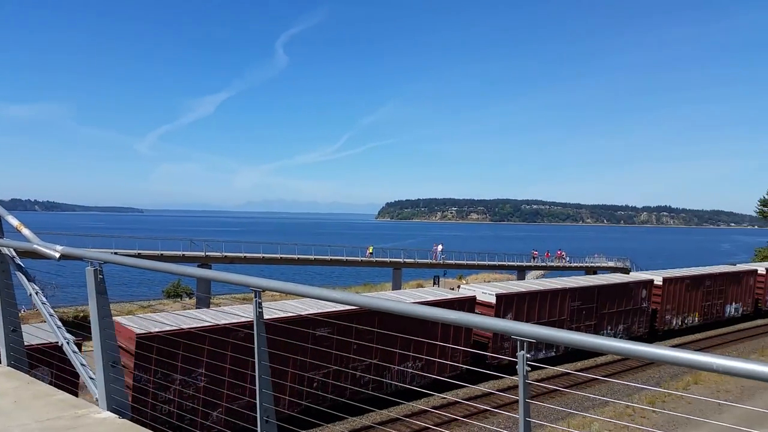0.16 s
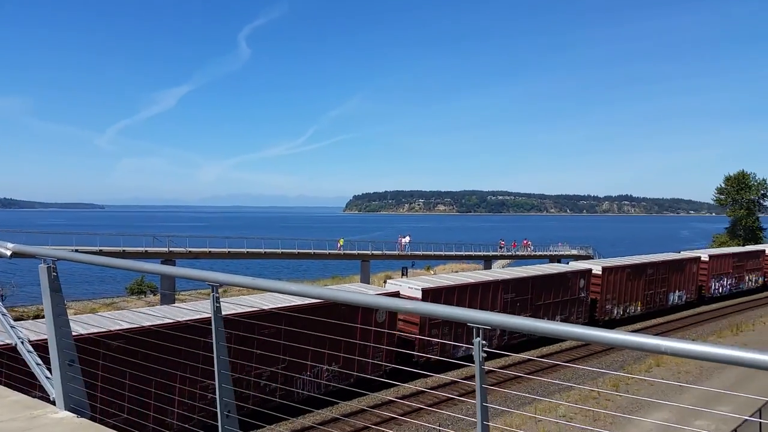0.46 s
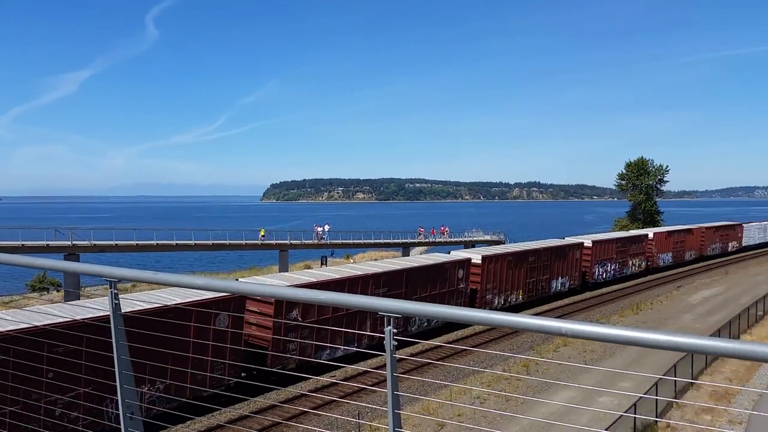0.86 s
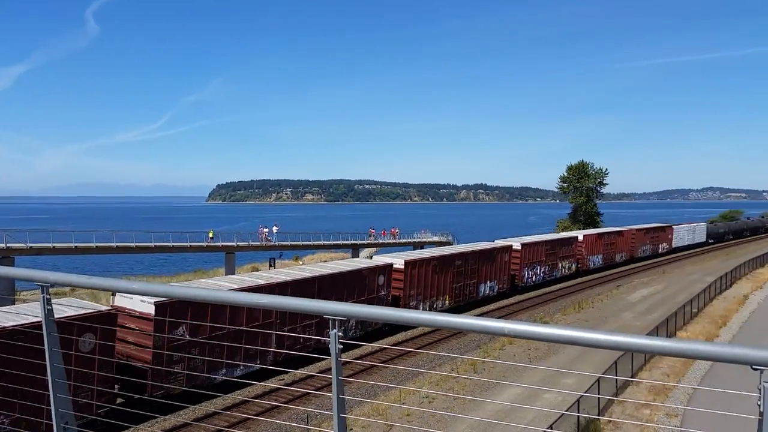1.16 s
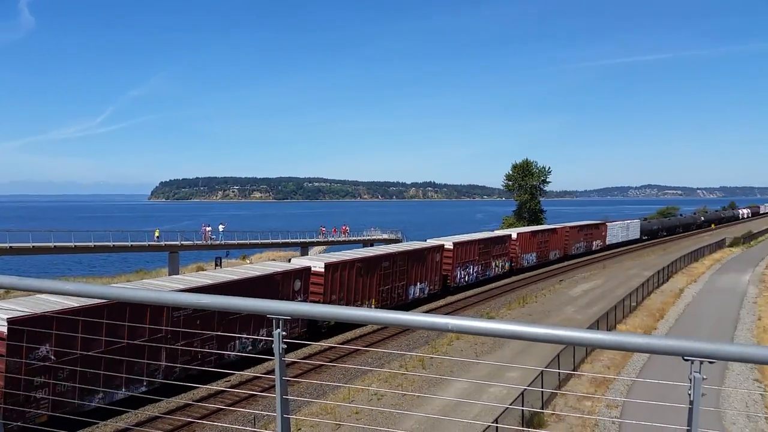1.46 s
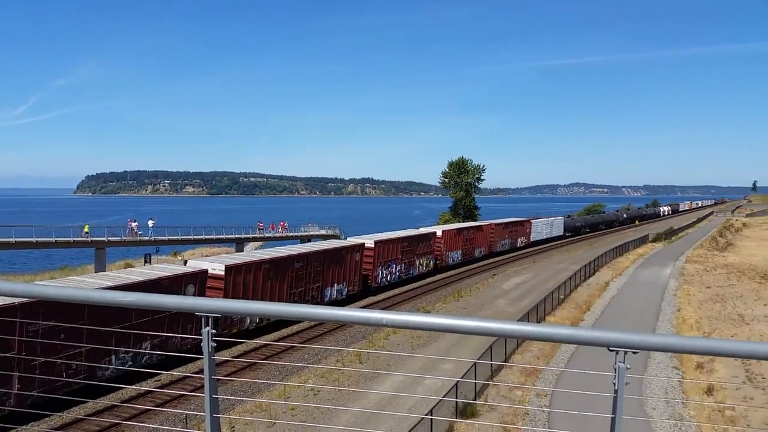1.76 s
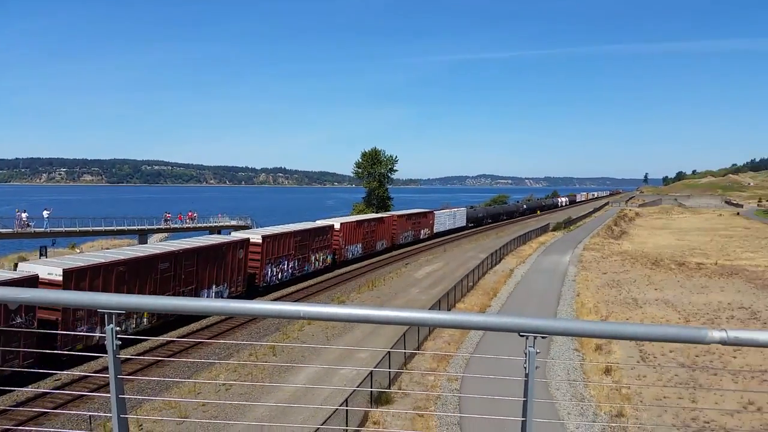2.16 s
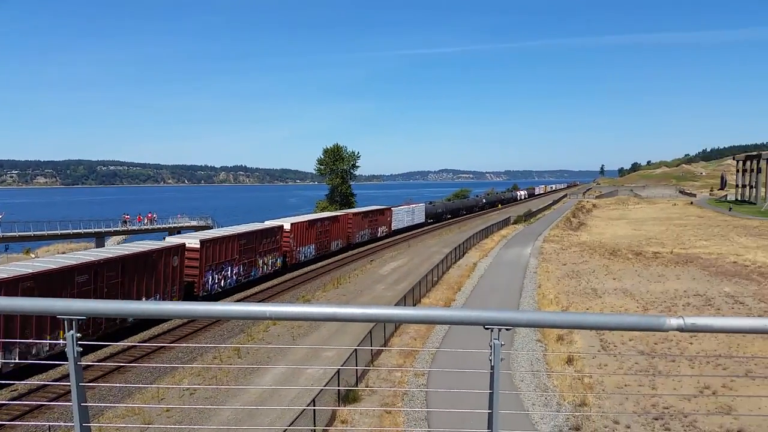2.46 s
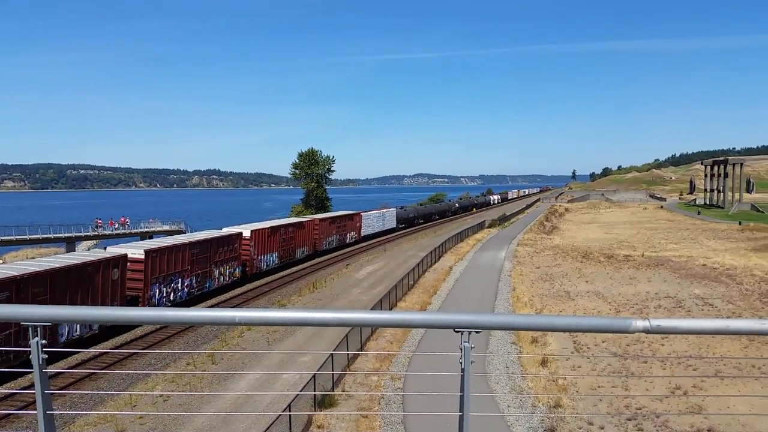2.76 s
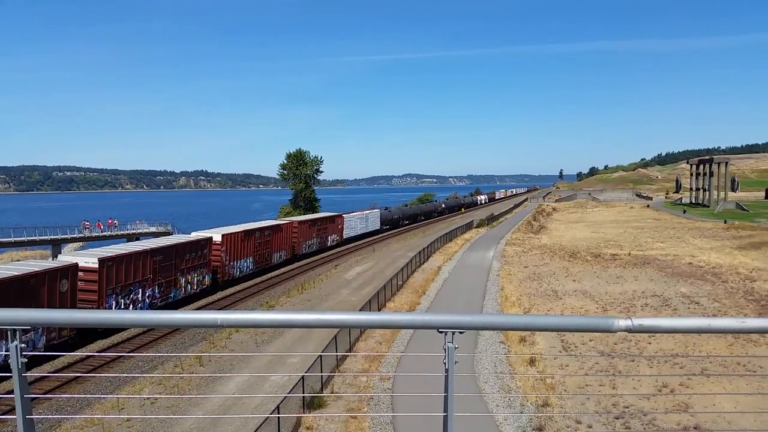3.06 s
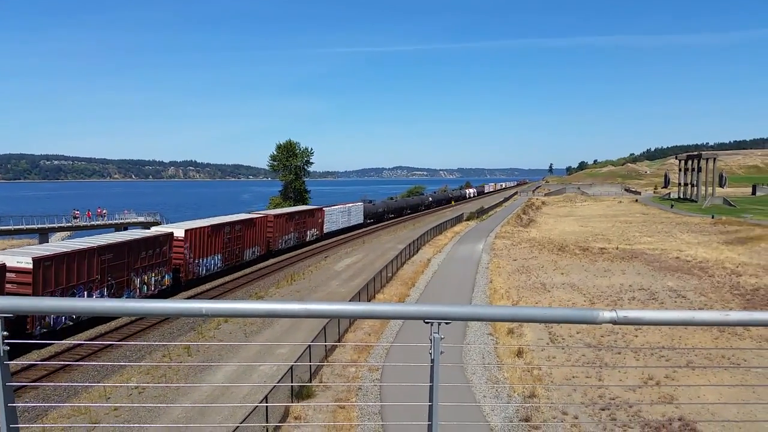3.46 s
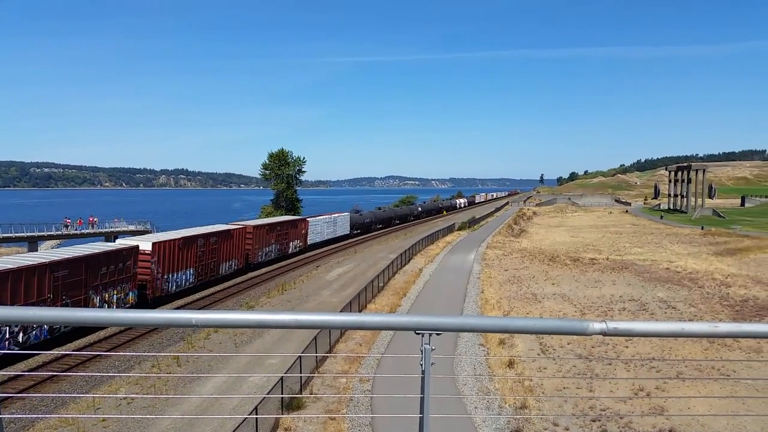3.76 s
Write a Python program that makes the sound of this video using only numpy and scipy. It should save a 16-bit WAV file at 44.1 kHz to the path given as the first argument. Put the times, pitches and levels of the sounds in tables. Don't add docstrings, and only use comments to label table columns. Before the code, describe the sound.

Freight train passing outdoors near water, heard from above on a windy handheld stereo microphone, wind much heavier on the right. Low buffeting and faint scrapes come first, then sharp metallic hissing, easing and returning over stronger rolling.

```python
import sys
import numpy as np
from scipy import signal
from scipy.fft import rfft, irfft
from scipy.io import wavfile
from scipy.ndimage import uniform_filter1d

SR = 44100
rng = np.random.default_rng(int(sys.argv[2]) if len(sys.argv) > 2 else 0)


def voltage_ratio(decibels):
    exponent = np.asarray(decibels, float) / 20
    return 10 ** exponent


def output_pcm(signal):
    pcm = np.clip(np.atleast_2d(signal).T, -1, 1) * 32767
    wavfile.write(sys.argv[1], SR, np.round(pcm).astype(np.int16))


N = 172431


def in_time(rows):
    s, *columns = np.transpose(rows)
    return [np.interp(np.arange(N) / SR, s, column) for column in columns]


def at_hz(points, hz):
    point_hz, point_db = np.transpose(points)
    return np.interp(np.log(hz), np.log(point_hz), point_db)


def rms_one(x):
    return x / np.sqrt(np.mean(x ** 2) + 1e-20)


def drift(rate):
    r = np.exp(-80 * np.pi * rate / SR)
    slow = signal.lfilter([1], [1, -2 * r, r * r], rng.standard_normal(N // 40 + 2002))[2000:]
    return np.interp(np.arange(N) / 40, np.arange(len(slow)), rms_one(slow))


def colour(x, spectrum):
    hz = np.maximum(np.fft.rfftfreq(N, 1 / SR), 1)
    first_hz, first_db = spectrum[0]
    last_hz, last_db = spectrum[-1]
    closed = [(first_hz / 2, first_db - 30)] + list(spectrum) + [(last_hz * 2, last_db - 30)]
    return rms_one(irfft(rfft(x) * voltage_ratio(at_hz(closed, hz)), N))


def patchy(low_hz, high_hz, shared_db, own_db, rate, swing_db=0):
    # pitch_hz, share (dB per dB)
    tilt = [(30, -2.5), (150, 0.1), (400, 0.4), (1000, 0.92)]
    out, together, white = 0, drift(rate), rng.standard_normal((2, N))
    edges = np.minimum(20 * 2 ** np.arange(0, 10.1, .5), 19500)
    for k, (low, high) in enumerate(zip(edges, edges[1:])):
        if high > low_hz and low < high_hz:
            band_filter = signal.butter(2, [low, high], "band", fs=SR, output="sos")
            band = signal.sosfilt(band_filter, white[k % 2])
            flicker_db = shared_db * together + own_db * drift(2 * rate)
            out = out + band * voltage_ratio(flicker_db + swing_db * at_hz(tilt, low))
    return out


def streaky(x):
    streak_db, streak_s = 2.5, .25
    z = signal.stft(x, nperseg=512)[2]
    field = uniform_filter1d(rng.standard_normal(z.shape), size=int(streak_s * SR / 256), axis=1)
    return signal.istft(z * voltage_ratio(streak_db * rms_one(field)), nperseg=512)[1][:N]


def narrow(hz, width_hz, steady):
    phase = 2 * np.pi * np.cumsum(hz) / SR
    return rms_one((steady + drift(width_hz)) * np.cos(phase) + drift(width_hz) * np.sin(phase))


def swell(start, length, attack, release):
    t = np.arange(N) / SR - start
    rise = np.clip(t / attack + (start <= 0), 0, 1)
    return rise * np.exp(-np.maximum(t - length, 0) / release)


def flanges():
    # start_s, level_db
    pressure = [(0, -30.5), (.2, -37.5), (.38, -43), (.78, -43.5), (1.0, -37.5), (1.52, -31), (1.7, -37),
                (1.85, -34.5), (1.99, -39), (2.06, -19), (2.2, -23), (2.3, -24), (2.6, -22.5), (2.85, -32),
                (3.08, -31.5), (3.14, -24.5), (3.37, -23), (3.47, -27.5)]
    # start_s, level_db
    last_swell = [
        (3.47, -4.5),
        (3.72, -0.5),
        (3.91, -2.5),
    ]
    # pitch_hz, level_db
    hiss_right = [(4500, -17.5), (5510, -18.5), (7000, -17), (8500, -13), (9430, -2.5), (11100, 0),
                  (13500, -7), (15700, -11.5)]
    hiss_left = [(3500, 10), (5000, 14), (5700, 19), (6300, 24), (7200, 14), (8800, -25), (11500, -40),
                 (15700, -20)]
    # start_s, length_s, level_db, brightness_db
    scrapes = [
        (0.81, 0.03, -57, 12),
        (0.891, 0.098, -42.5, 4.5),
        (1.101, 0.095, -38.5, 3.5),
        (1.343, 0.083, -36, 3),
        (2.001, 0.07, -38.5, 11),
        (3.688, 0.021, -41, 3),
    ]
    # pitch_hz, level_db
    scrape_spectrum = [(1800, -9), (2400, 1), (2900, 1.5), (3800, 1), (4800, -6.5), (5600, -13),
                       (7500, -16), (9000, -12)]

    low, top = 0, 0
    for start, length, db, bright_db in scrapes:
        shape = swell(start, length, attack=0.027, release=0.041)
        low = low + voltage_ratio(db) * shape
        top = top + voltage_ratio(db + bright_db) * shape
    rasp = colour(streaky(rng.standard_normal(N)), scrape_spectrum)
    press = np.hypot(voltage_ratio(in_time(pressure)[0] + in_time(last_swell)[0]), top)

    noise = streaky(patchy(3000, 20000, shared_db=1.2, own_db=1, rate=9))
    hiss = colour(noise, hiss_right) + whistles()
    air = signal.sosfiltfilt(signal.butter(2, 12800, "high", fs=SR, output="sos"), hiss)
    hiss = hiss + air * (np.minimum(press / voltage_ratio(-40), 1) - 1)
    right = press * hiss + low * rasp

    left = colour(streaky(patchy(2000, 20000, shared_db=1.2, own_db=1, rate=9)), hiss_left)
    return np.array([voltage_ratio(-55) * press / voltage_ratio(-25) * left, right])


def whistles():
    # start_s, length_s, pitch_hz, slide (Hz per s)
    modes = [(0, .33, 9421, 0), (0, .3, 11150, 0), (.92, .5, 10300, 0), (2.05, .11, 9755, 0),
             (2.04, .15, 10271, 0), (2.04, .05, 10750, -7000), (2.04, .14, 11400, 0),
             (2.06, .25, 12100, 300), (2.1, .7, 12780, 300), (2.12, .06, 14303, 0), (2.05, .06, 15111, 0),
             (2.48, .42, 11360, -80), (2.15, .6, 6230, 0), (3.1, .3, 6240, 0), (3.1, .37, 11400, -300),
             (3.5, .41, 11270, -100), (3.27, .13, 12866, 0), (3.42, .49, 12880, -250),
             (3.12, .05, 10500, 0), (3.6, .2, 4700, 0), (2.3, .15, 4650, 0), (2.08, .15, 13178, 0),
             (2.1, .15, 12500, 0), (.92, .6, 7500, 0), (0, .2, 6100, 0), (1.12, .07, 2400, 5000),
             (1.1, .08, 3250, 0), (1.36, .05, 4600, 0), (1.35, .07, 3600, 0), (1.37, .06, 2800, 0),
             (1.37, .06, 6400, 0)]
    mode_db = [-6, -14, -13, -8, -7, -6, -11, -13, -14, -17, -19, -8, -23, -23, -7.5, -7.5, -9, -11, -12,
               -19, -19.5, -15, -16, -20, -21.5, -13, -17, -14, -14, -15, -20]
    edge_s, wander_hz, flutter_db = .055, 25, 2
    out, t = np.zeros(N), np.arange(N) / SR
    for (start, length, hz, slide), db in zip(modes, mode_db):
        pitch_hz = hz + slide * np.clip(t - start, 0, length) + wander_hz * drift(6)
        tone = narrow(pitch_hz, width_hz=45, steady=.6)
        out += voltage_ratio(db + flutter_db * drift(14.0)) * swell(start, length, edge_s, edge_s) * tone
    return out


def rolling():
    # start_s, level_db
    roar = [(0, -44.5), (.25, -50.5), (.8, -50.5), (1.0, -49.5), (1.9, -44.5), (2.02, -44), (2.6, -42),
            (3.1, -40), (3.35, -41), (3.45, -45), (3.7, -40.5), (3.91, -40)]
    # pitch_hz, level_db
    roar_right = [(400, -20), (900, 1), (1500, 1), (2200, 0), (3300, -4), (3800, -5.5), (4700, -13.5),
                  (5500, -15.5)]
    roar_left = [(400, -9), (1300, -7.5), (2200, -21), (3000, -8.5), (3750, 0.5), (4200, -4.5), (4750, -4),
                 (5700, -28)]
    alike_below_hz, right_db = 1300, 5.5
    right, other = (streaky(patchy(200, 14000, shared_db=1.28, own_db=0.4, rate=9.2)) for port in range(2))
    low = signal.butter(2, alike_below_hz, "low", fs=SR, output="sos")
    high = signal.butter(2, alike_below_hz, "high", fs=SR, output="sos")
    left = signal.sosfiltfilt(low, right) + signal.sosfiltfilt(high, other)
    ports = np.array([colour(left, roar_left), voltage_ratio(right_db) * colour(right, roar_right)])
    return voltage_ratio(in_time(roar)[0]) * ports


def wind():
    # start_s, level_db, brightness_db
    gusts = [(0, -14, -0.5), (.3, -14.5, 2), (.6, -15.5, 2), (.9, -15, 1), (1.05, -19, -1.5),
             (1.3, -21, -1), (1.6, -21.5, -2), (1.9, -20.5, -3.5), (2.2, -19, -3), (2.5, -17.5, -2),
             (2.75, -16.5, 1), (3.0, -16, -2), (3.25, -19, 2), (3.42, -16.5, -5), (3.65, -17.5, -2.5),
             (3.91, -22.5, 1.5)]
    # pitch_hz, level_db
    open_spectrum = [(20, -31), (43, -6.5), (78, 2), (160, -0.5), (260, -3), (409, -9.5), (818, -21),
                     (2760, -47)]
    # start_s, level_db
    shaded = [(0, -31), (.3, -29.5), (.9, -35.5), (1.2, -34), (1.5, -40), (1.9, -38), (2.2, -36),
              (2.7, -32), (3.1, -38), (3.45, -40.5), (3.91, -39)]
    # pitch_hz, level_db
    shaded_spectrum = [(20, -9), (45, 2.5), (90, 0.5), (160, -3), (300, -12), (500, -21.5), (900, -56),
                       (2000, -61)]
    strength_db, bright_db = in_time(gusts)
    noise = patchy(0, 5000, shared_db=1.5, own_db=0.74, rate=32.4, swing_db=bright_db)
    right = voltage_ratio(strength_db + 5.5) * evened(colour(noise, open_spectrum))
    right += edge_hum() + slaps()
    noise = patchy(0, 3000, shared_db=2.5, own_db=1.5, rate=18)
    left = voltage_ratio(in_time(shaded)[0]) * colour(noise, shaded_spectrum)
    leak = signal.sosfilt(signal.butter(1, (250, 1200), "band", fs=SR, output="sos"), right)
    return np.array([left + voltage_ratio(-42.5) * leak, right])


def evened(x):
    even_share, even_s = .35, .04
    short_power = uniform_filter1d(x ** 2, size=int(even_s * SR))
    long_power = uniform_filter1d(x ** 2, size=int(10 * even_s * SR))
    return rms_one(x * (short_power / long_power + 1e-3) ** (-even_share / 2))


def edge_hum():
    # start_s, pitch_hz, level_db
    hum = [(0, 180, -23), (.2, 105, -18), (.3, 170, -14.5), (.43, 250, -15), (.55, 155, -24),
           (.74, 90, -21), (.95, 210, -20.5), (1.1, 130, -24), (1.3, 120, -31), (2.0, 90, -26),
           (2.5, 120, -26), (2.62, 300, -25), (2.95, 150, -26.5), (3.3, 130, -21), (3.4, 100, -17.5),
           (3.58, 80, -18), (3.72, 170, -17.5), (3.91, 90, -30)]
    hum_hz, hum_db = in_time(hum)
    return voltage_ratio(hum_db) * narrow(hum_hz, width_hz=16, steady=1.6)


def slaps():
    # start_s, peak level_db, pitch_hz
    eddies = [(.288, -29, 790), (.446, -17, 700), (0.688, -23, 820), (.737, -19.5, 706), (.765, -34, 780),
              (.797, -22, 870), (1.082, -24, 685), (1.196, -27, 1010), (1.266, -33, 1660),
              (1.304, -30, 1300), (1.34, -26, 1240), (1.345, -18.5, 1040), (1.351, -29, 1360),
              (1.379, -24.5, 1450), (1.406, -24, 970), (1.415, -25, 1270), (1.475, -19, 684),
              (1.592, -20, 488), (1.593, -22.5, 830), (1.595, -27, 1270), (1.614, -31, 516),
              (1.692, -36, 760), (1.745, -26.5, 1160), (1.745, -21, 564), (1.84, -31, 1780),
              (1.842, -24, 795), (1.846, -17.5, 666), (1.851, -24, 706), (1.86, -21, 600)]
    cycles, boost_db = 4.93, 4
    out, t = np.zeros(N), np.arange(N) / SR
    for start, db, hz in eddies:
        age = np.clip((t - start) * hz / cycles, 0, 1)
        out += voltage_ratio(db + boost_db) * np.sin(np.pi * age) ** 2 * np.sin(2 * np.pi * hz * (t - start))
    return out


def self_noise():
    floor_db = [
        [-97],
        [-70],
    ]
    return voltage_ratio(floor_db) * rng.standard_normal((2, N))


def scene():
    return flanges() + rolling() + wind() + self_noise()


def roll_off(x):
    return signal.sosfilt(signal.butter(12, 15800, fs=SR, output="sos"), x)


def record(dry):
    ceiling = 1.12
    return roll_off(ceiling * np.tanh(dry / ceiling))


dry = scene()
out = record(dry)
output_pcm(out)
```